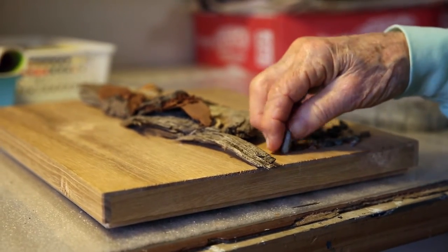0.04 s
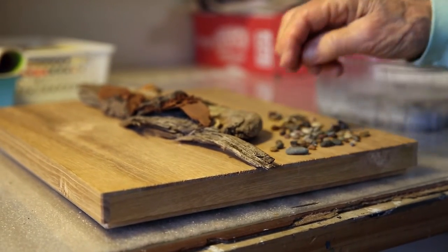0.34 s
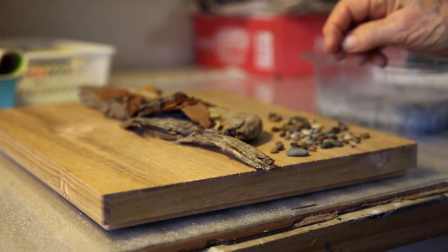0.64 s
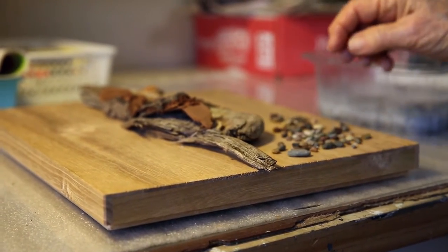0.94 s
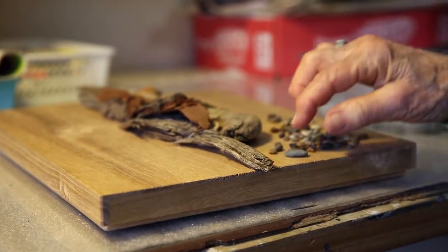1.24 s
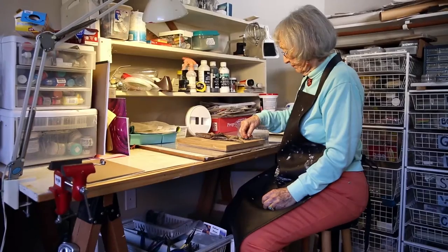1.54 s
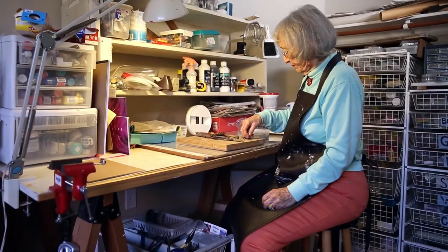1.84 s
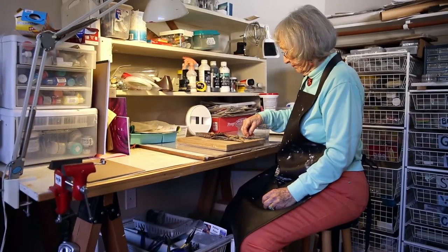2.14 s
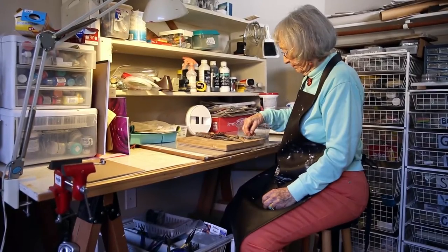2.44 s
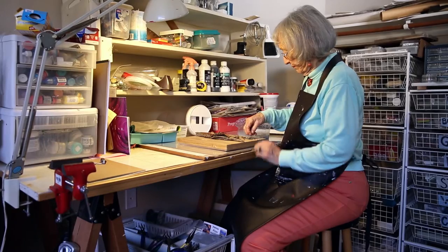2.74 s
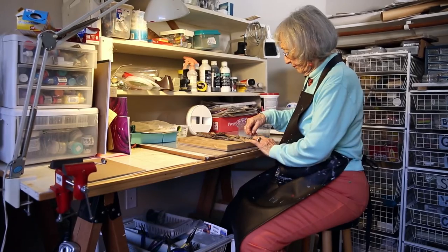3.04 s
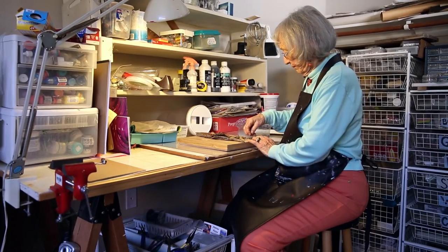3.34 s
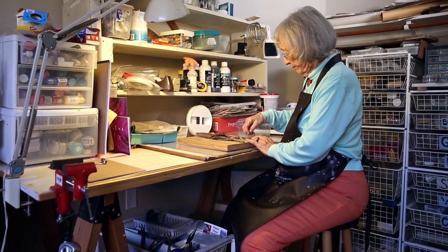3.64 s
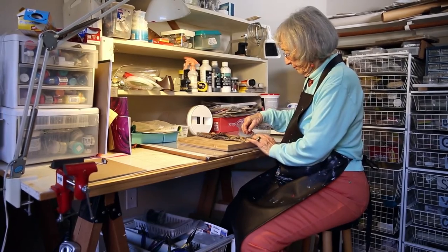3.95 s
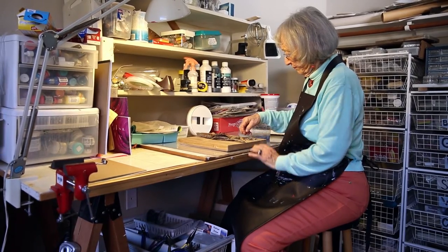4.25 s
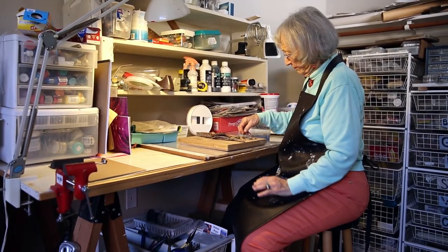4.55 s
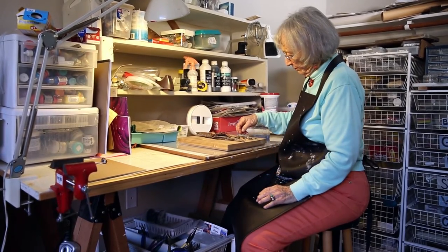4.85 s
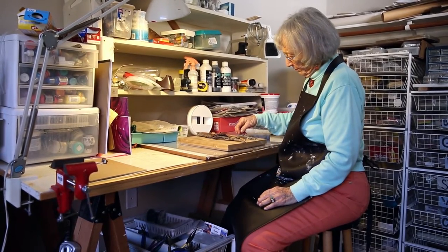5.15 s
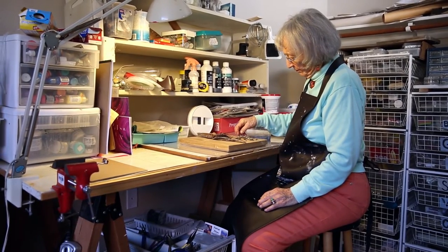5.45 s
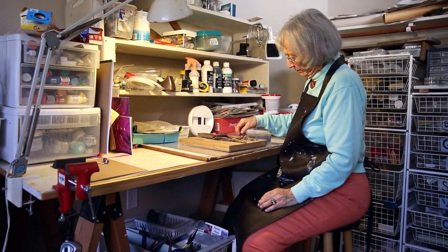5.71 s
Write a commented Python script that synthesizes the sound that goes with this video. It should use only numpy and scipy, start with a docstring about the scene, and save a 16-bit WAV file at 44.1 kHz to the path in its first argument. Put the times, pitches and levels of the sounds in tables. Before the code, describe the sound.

Pebbles land on wood with sharp clacks, wobble softly and rattle against each other, close by in a quiet workshop.

```python
"""Small stones are set down on a wooden board in a quiet workshop. Over a faint, fading hush the first one
lands with hard cracks that make the board ring, then rocks to rest in soft knocks. After a low rub, the scene
changes: room noise is present and more stones clatter, jostling grit. A stone is nudged, fingers brush through
the pile and a hand settles on the bench. Further stones land, wobble and clatter, and the small room answers
each contact with a short echo."""
import sys
import numpy as np
from scipy import signal
from scipy.fft import rfft, irfft
from scipy.io import wavfile
from scipy.ndimage import uniform_filter1d

SR = 44100
rng = np.random.default_rng(int(sys.argv[2]) if len(sys.argv) > 2 else 0)


def master_out(mix):
    """Clip the mix to full scale and print it as 16-bit PCM to the path in sys.argv[1]."""
    frames = np.transpose(np.atleast_2d(mix))
    ceiling = np.clip(frames, -1, 1)
    pcm = np.round(ceiling * 32767).astype(np.int16)
    wavfile.write(sys.argv[1], SR, pcm)


N = 254898
TAPS = 8192  # samples used to shape one contact
HZ = np.fft.rfftfreq(TAPS, 1 / SR)
SCENE_CHANGE_S = 1.392


def amp(db):
    """Turns decibels into gain."""
    return 10 ** (np.asarray(db) / 20)


def unit_rms(x):
    """Scales a signal to an average strength (rms) of 1."""
    return x / np.sqrt(np.mean(x ** 2) + 1e-20)


def curve(points, hz):
    """Joins (frequency, value) points along a log-frequency axis."""
    f, value = np.transpose(points)
    return np.interp(np.log(hz + 1), np.log(f + 1), value)


def add(mix, s, sound):
    """Adds a sound into the mix at s seconds."""
    part = mix[:, round(s * SR):][:, :sound.shape[1]]
    part += sound[:, :part.shape[1]]


def ringing_filter(db):
    """Turns a dB curve into a filter that rings only after the blow (minimum phase)."""
    log_gain = np.log(amp(np.r_[db, db[-2:0:-1]]))
    return np.exp(np.conj(signal.hilbert(log_gain)))[:len(db)]


def noise(colour):
    """Steady noise of rms 1 with a given spectrum."""
    gain = amp(curve(colour, np.fft.rfftfreq(N, 1 / SR)))
    return unit_rms(irfft(rfft(rng.standard_normal(N)) * gain, N))


def vibration(t60, rise_s=0.):
    """A burst of noise that swells over rise_s and loses 60 dB in t60 seconds."""
    t = np.arange(TAPS) / SR
    rise = 1 - np.exp(-t / (rise_s + 1e-9))
    return rng.standard_normal(TAPS) * rise * amp(-60 * t / t60)


def swell(middle_s, half_s):
    """A smooth rise and fall around a moment."""
    return np.exp(-((np.arange(N) / SR - middle_s) / half_s) ** 2)


def peak(hz, width_hz):
    """The shape of one resonance (a pitch at which a thing likes to ring), of height 1."""
    return 1 / (1 + (2 * (HZ - hz) / width_hz) ** 2)


def hush(db=-65.5, hold_s=0.63, fade_db_per_s=33.5):
    """A faint, hollow hush holds, then fades."""
    # tone of the hush: f/Hz, level/dB
    colour = [(30, -9.5), (70, -35), (200, -21.5), (330, -18.5), (460, -3.5), (700, -12), (1200, -17),
              (2500, -22), (6000, -26.5), (10000, -33), (16000, -48.5)]
    fading_s = np.maximum(np.arange(N) / SR - hold_s, 0)
    return amp(db - fade_db_per_s * fading_s) * noise(colour)


def contact(burst, colour_db, tick=0., span_s=0.0096, stone_db=4.0, stone_width_hz=240):
    """A blow rings through board and stone. Two rows: the direct sound, and the sound sent into the room."""
    # resonances of the board with its stones: f/Hz, width/Hz, height/dB
    board = [(387, 170, 1.5), (563, 66, 4), (617, 35, 6.5), (857, 210, 12), (1095, 56, 7.5), (1293, 39, 6),
             (1400, 32, 9), (1510, 72, 6.5), (1697, 92, 8), (1903, 230, 6), (2640, 52, 6), (3180, 120, 4.5),
             (3390, 69, 6.5), (3960, 220, 5), (4750, 90, 5), (5010, 240, 6), (5670, 64, 7), (6350, 51, 3.5),
             (8290, 160, 7.5), (9340, 210, 5)]
    spectrum = rfft(burst / np.linalg.norm(burst)) + tick  # the first touch is one clean pulse
    # taking out the burst's broad shape leaves only its fine unevenness
    broad_db = 10 * np.log10(uniform_filter1d(abs(spectrum) ** 2, size=110))
    # where the blow lands decides how strongly each resonance answers; each stone adds its own
    modes = [(hz, width, db * (1 + 0.33 * rng.standard_normal())) for hz, width, db in board]
    modes += [(hz, stone_width_hz, stone_db) for hz in rng.uniform(2000, 15000, size=12)]
    modes_db = sum(db * peak(hz, width) for hz, width, db in modes)
    # the room gathers sound from all directions, so its peaks are flatter
    filters = [ringing_filter(colour_db + share * modes_db - broad_db) for share in (1, 0.23)]
    spectrum = spectrum * np.array(filters)
    # the middle band gets as much energy as span_s of sound at rms 1
    middle = (HZ > 500) & (HZ < 2400)
    energy = 2 * np.sum(abs(spectrum[:, middle]) ** 2, axis=1, keepdims=True) / TAPS
    return irfft(spectrum)[:, :TAPS // 2] * np.sqrt(span_s * SR / energy)


def stone_hits(crack_t60=0.0081, body_t60=0.035, body_db=-5, wood_t60=0.04, wood_db=-2):
    """Stone on wood thumps, stone on stone snaps; the wood answers a moment later, without the highs."""
    # sharp contacts: t/s, level/dB, hardness/dB, thump/dB
    hits = [(0.0183, -22.5, -19.5, -28), (0.0523, -19.5, -22.5, -18), (0.0739, -28.5, -34, -15),
            (0.226, -18.5, -13, -14), (0.2596, -28, -25.5, -21), (1.494, -27, 6, -12),
            (1.5765, -24, -38.5, -27), (1.5905, -23.5, -1, -23.5), (1.5978, -29.5, 1.5, -11),
            (1.6089, -25, -11.5, -42), (1.6285, -34.5, 7, -26), (1.6428, -33, 5.5, -26),
            (1.6496, -34, 9, -14.5), (1.6725, -37, 0, -15), (1.7112, -35, 2.5, -17.5),
            (1.744, -40.5, 0, -20), (1.7666, -47, 3, -23), (2.0405, -28.5, 0, -17.5),
            (2.089, -37.5, -1, -28), (2.1178, -47.5, -10.5, -16.5), (2.2925, -26, 1.5, -14.5),
            (2.3121, -31.5, -4.5, -15), (2.3296, -43, 7, -15), (2.3413, -40.5, -4.5, -31),
            (2.3728, -34, -2.5, -35), (3.2388, -19.5, -15, -20), (3.2444, -16.5, -13, -19.5),
            (3.2696, -32.5, -9, -20.5), (3.278, -27.5, -29, -22.5), (3.3068, -27, -3, -27.5),
            (3.3289, -33.5, 1.5, -17), (3.344, -33.5, 0, -41), (3.3558, -24.5, 2.5, -16.5),
            (3.387, -41, -1, -26.5), (3.4067, -34.5, -4.5, -16), (3.414, -38, -1, -32),
            (3.4483, -42.5, -17, -8), (3.706, -18.5, -16.5, -8.5), (3.887, -76, 20, -4.5),
            (4.4941, -24.5, -5, -6.5), (4.5133, -23, -5, -13), (4.5573, -32.5, -8.5, -18),
            (4.6146, -15.5, -14.5, -6.5), (4.6694, -35, -43, -23.5), (4.707, -21.5, -7, -21),
            (4.7481, -35, -3, -17.5), (4.791, -58, -4, -21.5), (4.859, -38, -9, -9.5),
            (5.5161, -29.5, -2, -15), (5.5312, -21, 2.5, -20), (5.539, -20, -16, -21.5),
            (5.556, -31.5, 5, -27), (5.5704, -29.5, 6, -17), (5.5851, -24.5, -0.5, -21),
            (5.597, -29, 3, -18), (5.627, -34, -6, -37), (5.6354, -32, 1.5, -43), (5.639, -21, -26, -22),
            (5.6536, -30, -6, -38), (5.6838, -36.5, -24, -17), (5.7258, -41, -7, -17),
            (5.749, -42, 4.5, -7)]
    # spots where the stones land: from t/s, hollowness/dB, clack/dB, favoured board resonance f/Hz,
    # its lift/dB, ring of the stone f/Hz, share of the pile's ring
    spots = [(0, -6.5, 2, 840, 2, 1900, 0.11), (.15, -7, 4, 2000, 8, 2527, 0.08),
             (1.4, -6.5, 6.5, 912, 3, 3390, 0.67), (1.95, -14.5, 6.5, 905, 1, 5720, .9),
             (3.1, -14, 5.5, 1668, 6, 2750, 0.12), (3.6, -22.5, 4, 1695, 3, 5120, 0.12),
             (4.4, -10.5, 6.5, 1020, 6, 4800, .1), (5.4, -5.5, 4.5, 1390, 2.5, 4670, .1)]
    # tone of a sharp contact: f/Hz, level/dB
    crack_colour = [(40, -2), (150, 4), (320, 7), (540, 10.5), (740, -4), (1000, -1), (1700, 0), (2400, -3),
                    (3500, -2), (5200, -3), (7000, -3.5), (10000, -3), (13500, -8.5), (16000, -16)]
    # pebbles of the pile that ring along: f/Hz, width/Hz, height/dB
    pile_peaks = [(3110, 300, 7.5), (3880, 140, 7.5), (5250, 640, 3.5)]
    # valleys between those peaks: f/Hz, level/dB
    pile_valleys = [(2000, -0.5), (2800, -7), (4500, -3), (6500, 0.5)]
    pile_db = curve(pile_valleys, HZ) + sum(db * peak(hz, width) for hz, width, db in pile_peaks)
    no_treble = signal.butter(2, 2000, fs=SR, output="sos")
    no_bass = signal.butter(2, 450, "high", fs=SR, output="sos")  # the bench damps the bass
    out = np.zeros((2, N))
    for s, db, hard, thump in hits:
        spot_index = sum(s >= spot[0] for spot in spots[1:])
        _, hollow, spot_clack, spot_hz, lift, stone_hz, pile_share = spots[spot_index]
        wood = signal.sosfilt(no_treble, vibration(wood_t60, rise_s=0.0014))
        crack = vibration(crack_t60)
        body = signal.sosfilt(no_bass, amp(body_db) * vibration(body_t60) + amp(wood_db) * wood)
        clack = spot_clack + 0.3 * hard
        hardness = [(130, thump), (270, thump - 4), (390, thump), (590, hollow), (720, -3),
                    (800, -2), (1900, 2), (3400, clack), (5500, clack), (9000, hard)]
        ring_db = lift * peak(spot_hz, 190) + 3.5 * peak(stone_hz, 260) + pile_share * pile_db
        colour_db = curve(crack_colour, HZ) + curve(hardness, HZ) + ring_db
        add(out, s, amp(db) * contact(crack + body, colour_db, tick=0.21))
    return out


def room_echo(sound, first_s=0.0014, build_s=0.0075, echoes_per_s=4000):
    """Sound bounces off bench, shelves and walls; each frequency band dies at its own speed."""
    # time the echo takes to lose 60 dB: f/Hz, t/s
    decay_times = [(150, 0.6), (500, 0.39), (1200, 0.4563), (3000, 0.28), (6000, 0.2958), (14000, 0.32)]
    # strength of the echo: f/Hz, level/dB
    levels = [(150, -19.5), (500, -10), (1500, -13), (5000, -11.5), (9000, -14), (15000, -17.5)]
    build_up = np.clip((np.arange(SR) / SR - first_s) / build_s, 0, 1)
    echoes = rng.standard_normal(SR) * (rng.random(SR) < echoes_per_s / SR) * build_up
    hz, t, bands = signal.stft(unit_rms(echoes), SR, nperseg=256)
    t60 = curve(decay_times, hz)[:, None]
    unit_energy = np.sqrt(2 * np.log(1000) / (t60 * SR))  # slow and fast bands carry equal total energy; slow bands start quieter
    fade = amp(curve(levels, hz)[:, None] - 60 * t / t60)
    tail = signal.istft(bands * unit_energy * fade, SR, nperseg=256)[1]
    return signal.fftconvolve(sound, tail)[:N]


def knock(db, hollow_db, clack_db, room_db=-3):
    """A stone rolls onto another face: the knock swells briefly and is dull."""
    # tone of a soft contact: f/Hz, level/dB
    colour = [(60, -20.5), (250, -14), (450, 11.5), (600, 10), (750, -10.5), (1100, -4), (1900, -1.5),
              (2600, -0.5), (4200, 0.5), (6000, -13.5), (8000, -20.5), (16000, -38.5)]
    hardness = [(580, hollow_db), (850, 0.0066), (1900, 0.013), (3200, clack_db)]
    burst = vibration(t60=0.043, rise_s=0.00086)
    return amp([[db], [db + room_db]]) * contact(burst, curve(colour, HZ) + curve(hardness, HZ))


def wobbling():
    """Uneven stones tip over and rock to rest in soft knocks."""
    # soft knocks: t/s, level/dB, clack/dB
    knocks = [(0.1776, -48.5, -16), (1.902, -46.5, -10), (3.8386, -38.5, -9.5), (3.9273, -43.5, -13.5),
              (3.972, -43, -8), (4.0524, -45, -27), (4.08, -54.5, -10), (4.1272, -53.5, -18),
              (4.1446, -49, -19), (4.203, -52, -19.5), (4.2255, -46.5, -14.5), (4.9164, -45.5, -6.5),
              (4.951, -39.5, -8.5), (4.9764, -46, -12), (5.0127, -47, -3.5), (5.028, -45.5, -19),
              (5.06, -52.5, -10), (5.088, -45.5, -11), (5.134, -50.5, -18), (5.173, -50.5, -20),
              (5.193, -55.5, -15), (5.226, -55, -15.5), (5.268, -61, -20.5)]
    out = np.zeros((2, N))
    for s, db, clack_db in knocks:
        hollow_db = -12 + 0.48 * (-44.5 - db)  # the softer the knock, the more hollow
        add(out, s, knock(db, hollow_db, clack_db))
    return out


def rocking(start_s=.376, swing_s=.086, start_db=-52, fade_db_per_s=39):
    """The first stone rocks between two edges, ever faster and softer."""
    out = np.zeros((2, N))
    swing_start = start_s
    for _ in range(9):
        for far in (0, 1):  # the far edge lands about mid-swing, louder and less hollow
            s = swing_start + far * .535 * swing_s
            db = start_db + far * 2.5 - fade_db_per_s * (s - start_s) + rng.standard_normal()
            add(out, s, knock(db, hollow_db=5.5 - far * 5, clack_db=-15.5))
        swing_start += swing_s
        swing_s *= .9
    return out


def rub(db=-69.5):
    """One soft, low rub swells and fades."""
    # tone of the rub: f/Hz, level/dB
    colour = [(30, -13.5), (150, -16), (300, -9), (420, 8.5), (520, -4), (700, -21.5), (2000, -36),
              (16000, -55)]
    return amp(db) * swell(middle_s=1.117, half_s=0.049) * noise(colour)


def room_noise(air_db=-64, hum_hz=60.4, hum_db=-74.5):
    """From the scene change on, steady, low room noise is heard with a trace of mains hum."""
    # tone of the room noise: f/Hz, level/dB
    colour = [(15, -15.5), (25, -0.5), (49, -8), (249, -10.5), (344, -13.5), (394, -11.5), (503, -18),
              (545, -9.5), (714, -15.5), (1290, -19.5), (2160, -24.5), (3920, -25.5), (7510, -29),
              (14800, -29), (16000, -27.5)]
    t = np.arange(N) / SR
    hum = amp(hum_db) * unit_rms(np.sin(2 * np.pi * hum_hz * t))
    return (t > SCENE_CHANGE_S) * (amp(air_db) * noise(colour) + hum)


def grit(t60=0.016, fade_db=10, count=14):
    """Tiny bright collisions fill the gaps of a clatter and die down with it."""
    # spells of jostled grit: t/s, length/s, level of the first grains/dB
    spells = [(1.587, .17, -35.5), (2.289, 0.084, -49.5), (3.254, 0.15, -55), (5.56, 0.16, -49)]
    colour_db = curve([(300, -23), (1200, 1.0), (4000, 3), (12000, -5), (16000, -5.5)], HZ)
    out = np.zeros((2, N))
    for s, length, db in spells:
        for progress in (np.arange(count) + rng.random(count)) / count:
            grain = contact(vibration(t60), colour_db)
            add(out, s + progress * length, amp(db - fade_db * progress) * grain)
    return out


def nudging(scatter_db=2, slip_s=.004):
    """A pushed stone stutters over the wood in three quick, light knocks."""
    # pushes along the board: t/s, length/s, level/dB
    nudges = [(2.464, 0.031, -54.5), (3.479, 0.032, -52), (3.545, 0.015, -51.5), (3.59, .02, -53),
              (3.623, 0.023, -52)]
    out = np.zeros((2, N))
    for start, length, db in nudges:
        for s in np.linspace(start, start + length, 3):
            s += slip_s * rng.uniform(-0.85, 1)
            add(out, s, knock(db + scatter_db * rng.standard_normal(), hollow_db=-4, clack_db=1))
    return out


def fingers(grain_db=2):
    """Skin slides over grit: a faint, grainy hiss."""
    # strokes over stones and wood: middle t/s, half length/s, level/dB, treble/dB
    strokes = [(2.776, .13, -65, -14.5), (2.945, 0.074, -61.5, 1.5), (3.14, .04, -67.5, 1),
               (3.685, 0.31, -63, 3), (4.376, 0.079, -62.5, -2.5)]
    # tone of the brushing: f/Hz, level/dB
    brush_colour = [(100, -18), (600, 6.5), (1500, 7.5), (2500, -4.5), (4500, 2), (7500, -7.5), (11000, 0),
                    (16000, -8)]
    flicker = amp(grain_db * unit_rms(uniform_filter1d(rng.standard_normal(N), size=200)))
    out = np.zeros(N)
    for s, half_s, db, treble in strokes:
        tilt = [(7000, 0.013), (11000, treble)]
        colour = [(hz, level + curve(tilt, hz)) for hz, level in brush_colour]
        out += amp(db) * swell(s, half_s) * unit_rms(noise(colour) * flicker)
    return out


def hand_bump(at_s=2.889, db=-57, top_hz=90, skin_db=-6):
    """The soft thud of a hand on the bench, with a light tick of skin."""
    thud = signal.sosfilt(signal.butter(2, top_hz, fs=SR, output="sos"), vibration(t60=.16))
    thud *= np.sqrt(SR / (2 * top_hz))  # makes up for the strength lost in the filter
    skin = amp(skin_db) * vibration(t60=.02)
    out = np.zeros((2, N))
    add(out, at_s, amp(db) * (thud + skin)[None])
    return out


def scene():
    """The stones close by, the room's echo of them and the quiet background."""
    direct, into_room = stone_hits() + grit() + wobbling() + rocking() + nudging() + fingers() + hand_bump()
    return (direct + room_echo(into_room) + hush() + rub() + room_noise())[None]


def record(dry, thin_hz=290, top_hz=15950):
    """The bass is thin until the scene changes; peaks stop at full scale; the very top is cut."""
    thin = signal.sosfilt(signal.butter(2, thin_hz, "high", fs=SR, output="sos"), dry)
    heard = np.where(np.arange(N) / SR < SCENE_CHANGE_S, thin, dry)
    low_pass = signal.firwin(401, top_hz, window=("kaiser", 8), fs=SR)
    return signal.oaconvolve(np.clip(heard, -1, 1), low_pass[None], "same")


dry = scene()
out = record(dry)
master_out(out)
```